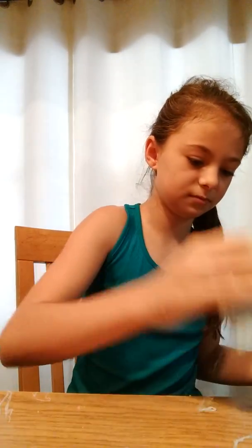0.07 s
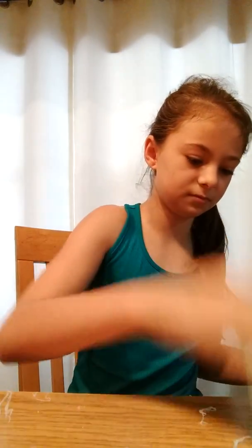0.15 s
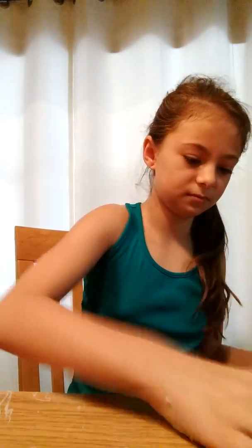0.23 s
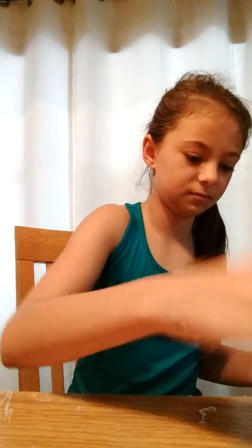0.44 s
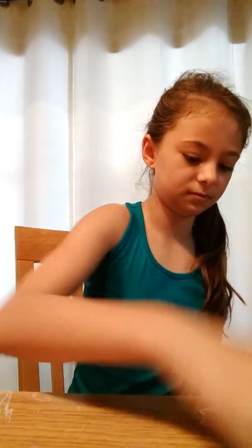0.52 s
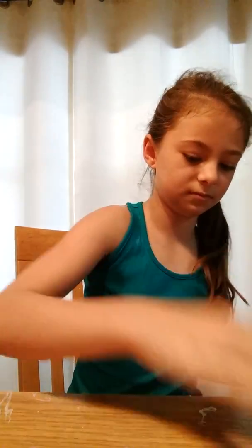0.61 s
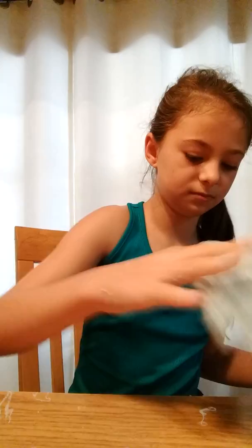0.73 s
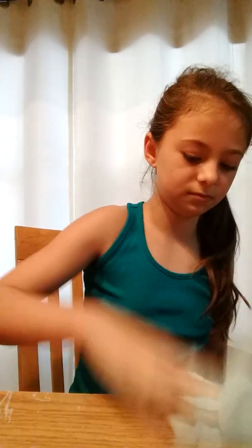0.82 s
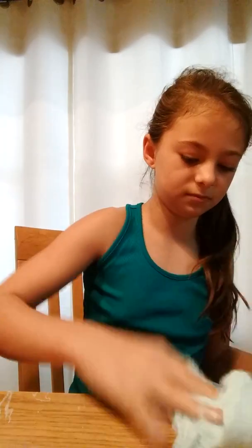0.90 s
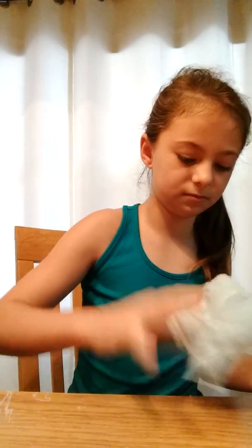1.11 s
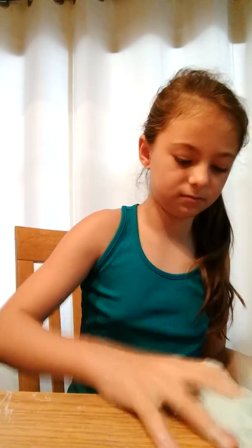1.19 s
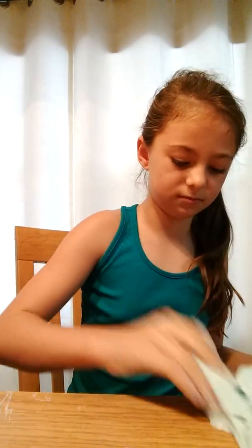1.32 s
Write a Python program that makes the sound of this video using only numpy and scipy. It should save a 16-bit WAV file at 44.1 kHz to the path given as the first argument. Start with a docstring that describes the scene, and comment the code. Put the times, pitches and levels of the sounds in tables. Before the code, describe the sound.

A lump of slime is slapped onto a wooden table four times, each a short wet pop and thud, the last one weak. Between slaps it peels off with soft squelches and dull bumps, close by in a small room.

```python
"""A soft squelch and a dull bump over faint hiss: a hand handles a lump of slime on a wooden table.
The lump is slapped down four times. Each slap squeezes out trapped air with a short pop, cracks
and spatters wetly, and thumps the table top. Between slaps the hand bumps the table and the slime
peels off with a squelch and a few sticky ticks. The room is small, with a stereo phone close by."""
import sys
import numpy as np
from scipy import signal
from scipy.fft import rfft, irfft
from scipy.io import wavfile

SR = 44100
rng = np.random.default_rng(int(sys.argv[2]) if len(sys.argv) > 2 else 0)


def store_pcm(level_fs):
    """Save levels as 16-bit WAV."""
    pcm = np.round(np.clip(level_fs, -1, 1) * 32767).astype(np.int16)
    wavfile.write(sys.argv[1], SR, np.atleast_2d(pcm).T)


N = 59535
TIME_S = np.arange(N) / SR
BINS_HZ = np.fft.rfftfreq(2 * N, 1 / SR)


def undb(db):
    return 10 ** (np.asarray(db) / 20)


def unit_rms(x):
    return x / np.sqrt(np.mean(x ** 2))


def colour(x, curve):
    """Filter by (freq_hz, gain_db) points."""
    hz, db = np.array(curve, float).T
    gain = undb(np.interp(np.log(BINS_HZ + 1), np.log(hz), db))
    return irfft(rfft(x, 2 * N) * gain)[:N]


def noise(curve):
    return unit_rms(colour(rng.standard_normal(N), curve))


def crackle(curve, spread_db=6):
    """Dense tiny wet clicks of uneven size."""
    clicks = rng.standard_normal(N) * undb(spread_db * rng.standard_normal(N))
    return unit_rms(colour(clicks, curve))


def swell(peak_s, rise_s, decay_s):
    """Exponential rise to 1, exponential decay."""
    t = TIME_S - peak_s
    return np.exp(-np.where(t < 0, -t / rise_s, t / decay_s))


def knock(peak_s, pitch_hz, rise_s, decay_s):
    """Low ring with a rounded onset."""
    t = TIME_S - peak_s
    envelope = np.exp(-np.where(t < 0, (t / rise_s) ** 2, t / decay_s))
    return np.sin(2 * np.pi * pitch_hz * t) * envelope


# Background spectrum: freq_hz, gain_db
BACKGROUND_SPECTRUM = [(20, -8), (55, -2.5), (85, -3), (135, 2.5), (200, -7.5), (300, -9), (700, -15),
                       (1400, -13.5), (2200, -23), (3400, -15.5), (5000, -21), (9000, -32), (16000, -34.5)]
# Background contour: time_s, level_db
BACKGROUND_LEVELS = [(0, -60), (.2, -63), (.45, -68.5), (.8, -62), (1.0, -64.5), (1.14, -73), (1.35, -72.5)]


def background():
    """Faint room rumble and hiss."""
    time_s, level_db = np.array(BACKGROUND_LEVELS).T
    return noise(BACKGROUND_SPECTRUM) * undb(np.interp(TIME_S, time_s, level_db))


# Squelch spectrum: freq_hz, gain_db
PEEL_SPECTRUM = [(80, -13), (300, -10), (750, -3), (950, -5), (1400, 2.5), (2000, -13.5), (3400, -13),
                 (6000, -20.5), (16000, -27.5)]
# Slime peeling off: peak_s, level_db, rise_s, decay_s
PEELS = [(.012, -48.5, 0.021, 0.015), (0.342, -48, 0.022, 0.02), (0.599, -51, .004, 0.013),
         (.652, -48, 0.04, 0.015), (0.754, -58, .001, 0.0075), (0.822, -62.5, 0.0068, 0.0033),
         (0.97, -50.5, .028, 0.015), (1.179, -45.5, 0.0016, 0.0029), (1.241, -62, 0.03, 0.096),
         (1.348, -54.5, 0.015, .02)]


def peeling():
    """Soft squelches as the slime lets go."""
    envelope = sum(undb(db) * swell(peak_s, rise_s, decay_s) for peak_s, db, rise_s, decay_s in PEELS)
    return crackle(PEEL_SPECTRUM) * envelope


# Scuff spectrum: freq_hz, gain_db
SCUFF_SPECTRUM = [(40, -13), (70, 1), (140, 2), (280, -3.5), (450, -10), (1000, -21.5), (3000, -46)]
# Hand and lump on the table: peak_s, level_db, pitch_hz, decay_s
BUMPS = [(0.013, -55, 309, 0.0087), (0.099, -60, 130, 0.0088), (.279, -39, 136, 0.0074),
         (0.569, -52, 204, 0.019), (.600, -48, 154, .012), (0.759, -47, 300, 0.0038),
         (.767, -43.5, 135.7, 0.0096), (0.855, -41.5, 118.2, 0.012), (0.859, -31, 280, 0.0095),
         (.894, -35.5, 356, 0.0048), (.896, -44, 125, 0.012), (1.184, -45.5, 110, 0.034),
         (1.192, -41, 283.3, 0.017)]


def bumps(rise_s=0.005, scuff_db=-7.5):
    """Dull knocks, each with a low scuff, as hand and lump settle or lift."""
    scuff = undb(scuff_db) * noise(SCUFF_SPECTRUM)
    out = np.zeros(N)
    for peak_s, level_db, pitch_hz, decay_s in BUMPS:
        ring = knock(peak_s, pitch_hz, rise_s, decay_s)
        out += undb(level_db) * (ring + scuff * swell(peak_s, rise_s / 2, decay_s))
    return out


# Wet crack spectrum: freq_hz, gain_db
CRACK_SPECTRUM = [(500, -7.5), (1500, 5.5), (2300, 2.5), (3400, -23), (5000, -14.5), (6100, 7.5),
                  (8200, -8.5), (9800, 6), (12000, -1.5), (16000, -10.5)]
# Midrange snap of the crack: freq_hz, gain_db
SNAP_SPECTRUM = [(1000, -29), (2300, -8), (3200, -7.5), (4200, 1.5), (5500, -19.5), (16000, -36)]
# Spatter spectrum: freq_hz, gain_db
SPATTER_SPECTRUM = [(150, -17), (700, 4.5), (1450, 0.5), (2200, -2), (3200, -6.5), (4800, -9.5),
                    (6200, -13.5), (10000, -21.5), (16000, -23.5)]
# Slime landings: peak_s, rise_s, ring_s, thump_hz, thump_db, low_pop_hz, low_pop_db, high_pop_hz,
# high_pop_db, snap_db, crack_db, spatter_db, spatter_decay_s, table_db, boom_db
SLAPS = [(0.2178, 0.00051, 0.00093, 337.6, -15, 927, -13.5, 1383, -6, -17, -21, -27.5, 0.01, -44, -50),
         (.5526, 0.0013, 0.0015, 367, -26, 760, -20.5, 1353, -22, -36.5, -33, -31, 0.012, -46, -54),
         (0.8449, 0.00089, .0016, 518, -10, 849, -13, 1438, -20, -30, -18.5, -39.5, 0.024, -39.5, -52.5),
         (1.1874, .0012, 0.0026, 271.6, -41, 698, -38.5, 1338, -34.5, -77, -56.5, -46, 0.016, -51, -55.5)]


def slaps(thump_s=0.00064, crack_s=0.00069, boom_lag_s=0.035):
    """Each landing thumps, pops twice, cracks and spatters; table ring and a low boom follow."""
    crack = noise(CRACK_SPECTRUM)
    spatter = crackle(SPATTER_SPECTRUM)
    snap = noise(SNAP_SPECTRUM)
    out = np.zeros(N)
    for (peak_s, rise_s, ring_s, thump_hz, thump_db, low_pop_hz, low_pop_db, high_pop_hz,
         high_pop_db, snap_db, crack_db, spatter_db, spatter_decay_s, table_db, boom_db) in SLAPS:
        out += undb(thump_db) * knock(peak_s, thump_hz, 2 * thump_s, thump_s)
        out += undb(low_pop_db) * air_pop(peak_s, low_pop_hz, rise_s, ring_s)
        out += undb(high_pop_db) * air_pop(peak_s, high_pop_hz, rise_s, 1.8 * ring_s)
        out += undb(crack_db) * crack * swell(peak_s, crack_s, crack_s)
        out += undb(snap_db) * snap * swell(peak_s, crack_s, 2 * crack_s)
        out += undb(spatter_db) * spatter * swell(peak_s, 0.98 * rise_s, spatter_decay_s)
        out += undb(table_db) * table_ring(peak_s)
        out += undb(boom_db) * knock(peak_s + boom_lag_s, pitch_hz=58, rise_s=0.018, decay_s=0.045)
    return out


def air_pop(peak_s, pitch_hz, rise_s, decay_s):
    """Trapped air escapes: a heavily damped ring that builds as the contact closes."""
    return np.cos(2 * np.pi * pitch_hz * (TIME_S - peak_s)) * swell(peak_s, rise_s, decay_s)


# Table top modes: pitch_hz, level_db, t60_s
TABLE_MODES = [(108, -5.5, 0.1), (143.6, -3, .3), (190, -3.5, .2), (262, -1, 0.2), (349.6, -6, 0.28)]


def table_ring(start_s):
    """The struck wooden top rings in decaying modes."""
    age_s = np.maximum(TIME_S - start_s, 0)
    return sum(undb(db) * np.sin(2 * np.pi * hz * age_s) * np.exp(-np.log(1000) * age_s / t60_s)
               for hz, db, t60_s in TABLE_MODES)


# Sticky ticks: peak_s, level_db
TICKS = [(0.447, -59), (0.761, -56), (.787, -55.5), (.823, -56.5)]


def sticky_ticks(centre_hz=11000, decay_s=0.0006):
    """Tiny bright noise bursts as the slime unsticks."""
    spectrum = [(centre_hz / 10, -20), (centre_hz / 2, -12), (centre_hz, 0), (centre_hz * 2, -15)]
    envelope = sum(undb(db) * swell(peak_s, decay_s / 2, decay_s) for peak_s, db in TICKS)
    return noise(spectrum) * envelope


def wall_echo(x, delay_s=0.0086, level_db=-22.5):
    """One clear reflection from a nearby wall."""
    return undb(level_db) * np.interp(TIME_S - delay_s, TIME_S, x, left=0)


def echo_cloud(decay_s, first_echo_s=0.005):
    """Dense random reflections, unit energy."""
    echoes = rng.standard_normal(N) * (TIME_S > first_echo_s) * np.exp(-TIME_S / decay_s)
    return unit_rms(echoes) / np.sqrt(N)


# Room tail spectrum: freq_hz, gain_db
TAIL_SPECTRUM = [(50, 9.5), (140, -6.5), (350, 2), (600, -7), (1000, -15.5), (1500, -10.5), (2600, 0.5),
                 (3500, -2), (6000, 0), (10000, -11), (16000, -10)]


def room(x, early_db=-21.5, tail_db=-14, low_t60_s=0.45, high_t60_s=0.42, split_hz=2500):
    """Quick echoes from nearby surfaces, then a short tail whose treble fades first."""
    tail = np.zeros(N)
    for band, t60_s in (("low", low_t60_s), ("high", high_t60_s)):
        crossover = signal.butter(2, split_hz, band, fs=SR, output="sos")
        tail += signal.sosfilt(crossover, echo_cloud(t60_s / np.log(1000)))
    early = echo_cloud(decay_s=0.0038)
    response = undb(early_db) * early + undb(tail_db) * colour(tail, TAIL_SPECTRUM)
    return signal.fftconvolve(x, response)[:N]


# Room share that differs between channels: freq_hz, gain_db
DIFFUSE_SPECTRUM = [(60, -2.5), (200, -5), (600, -11.5), (3000, -12), (12000, -7)]
# Stereo processing, left phase against right: freq_hz, lead_rad
LEFT_PHASE = [(0, 1.8), (400, 1.0), (1100, 0), (1600, -1.0), (1800, -2.6), (2250, -3.2), (13400, -34.5),
              (16500, -27)]
# Left level against right: freq_hz, gain_db
LEFT_GAIN = [(60, 1), (300, -1), (1200, -1.38), (3000, -2.5), (12000, -3.5)]
# Microphone response: freq_hz, gain_db
MIC_RESPONSE = [(900, 2), (1200, 1.5), (1400, 0.5), (1750, -1), (1970, 7), (2300, -1), (2900, 1.5),
                (4000, -1), (5000, 0.5), (6100, -0.5), (7500, 2), (9800, 0.5), (11500, 1.5)]


def scene():
    """Slime, table and room, widened by the phone's stereo processing: left treble slightly delayed."""
    direct = slaps() + bumps() + peeling() + sticky_ticks()
    shared = direct + wall_echo(direct) + room(direct) + background()
    diffuse = colour(room(direct) + background(), DIFFUSE_SPECTRUM)
    lead_rad = np.interp(BINS_HZ, *np.array(LEFT_PHASE).T)
    shifted = irfft(rfft(shared + diffuse, 2 * N) * np.exp(1j * lead_rad))[:N]
    left = colour(shifted, LEFT_GAIN)
    right = shared - diffuse
    return np.array([colour(channel, MIC_RESPONSE) for channel in (left, right)])


def record(dry, low_cut_hz=45, high_cut_hz=16200, ceiling=0.78, offset_db=-50.5, settle_s=1.0):
    """The phone thins deep bass, rounds peaks and cuts the top; a DC offset settles on the left."""
    low_cut = signal.butter(2, low_cut_hz, "high", fs=SR, output="sos")
    high_cut = signal.ellip(8, 0.2, 70, high_cut_hz, fs=SR, output="sos")
    thin = signal.sosfilt(low_cut, dry)
    rounded = thin / (1 + (thin / ceiling) ** 6) ** (1 / 6)
    left_offset = np.outer([1, 0], undb(offset_db) * np.exp(-TIME_S / settle_s))
    return signal.sosfilt(high_cut, rounded + left_offset)


dry = scene()
out = record(dry)
store_pcm(out)
```